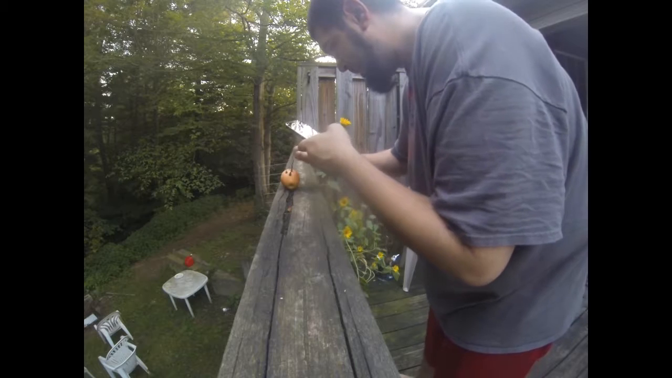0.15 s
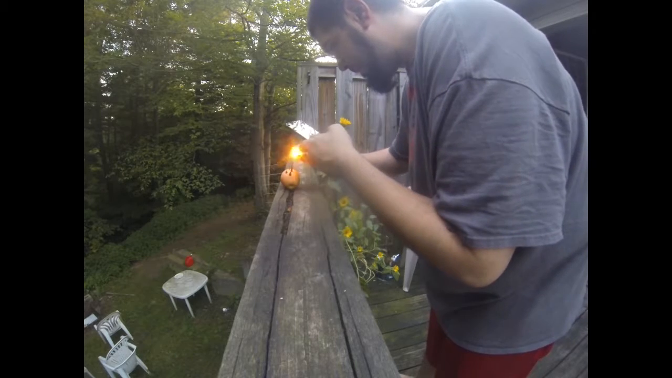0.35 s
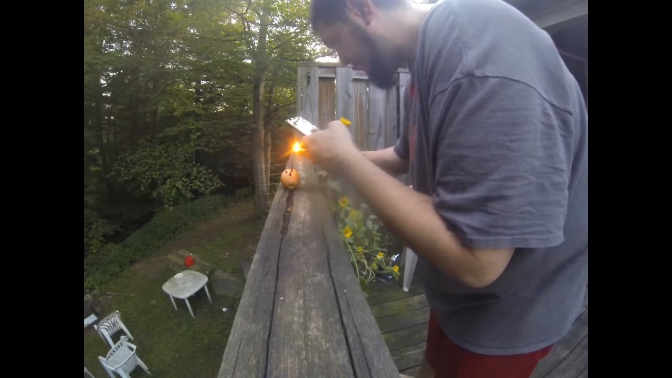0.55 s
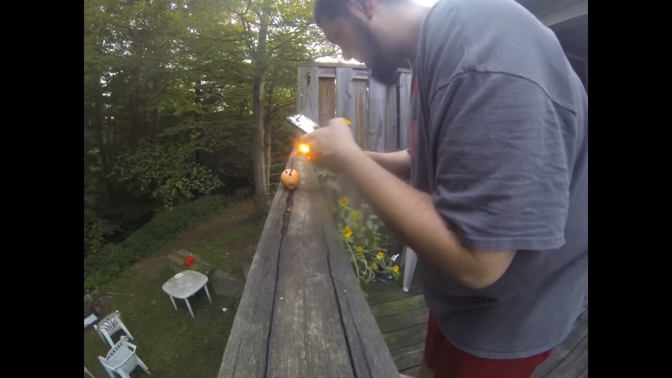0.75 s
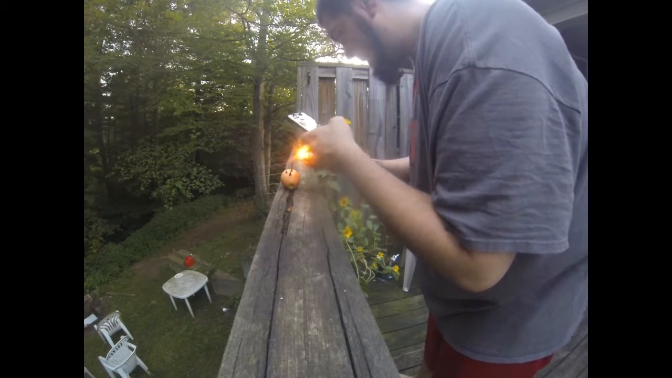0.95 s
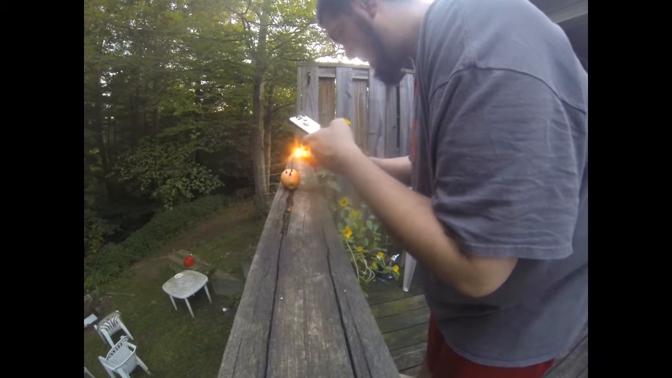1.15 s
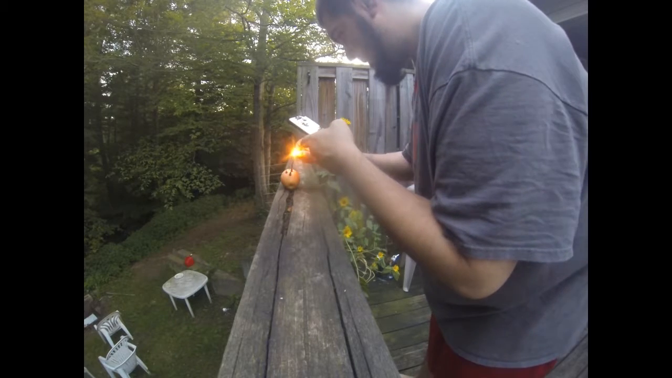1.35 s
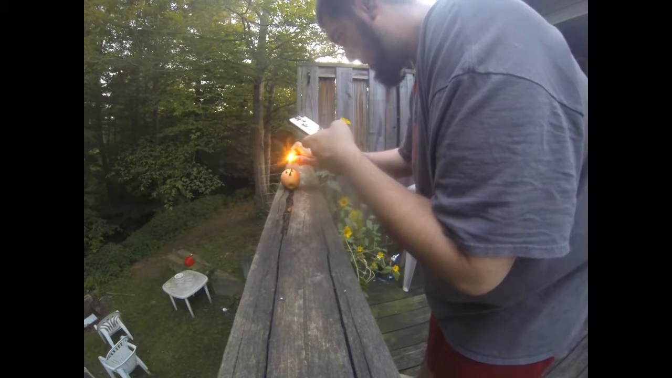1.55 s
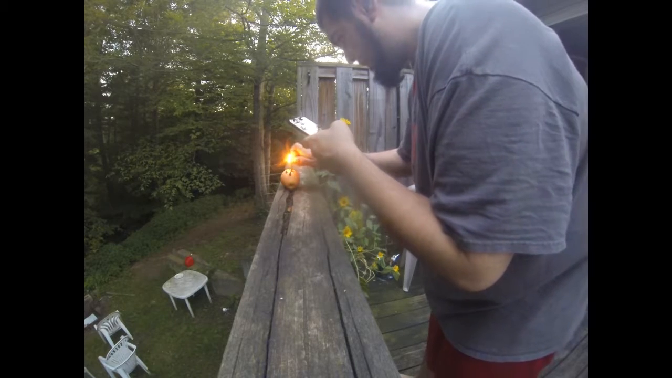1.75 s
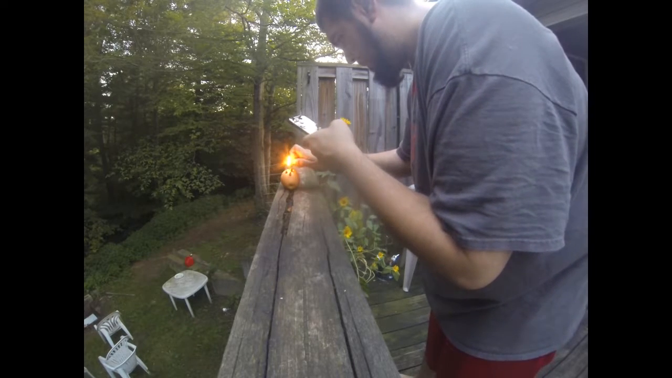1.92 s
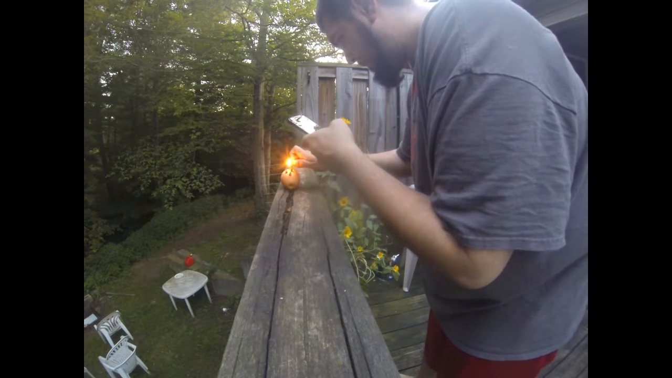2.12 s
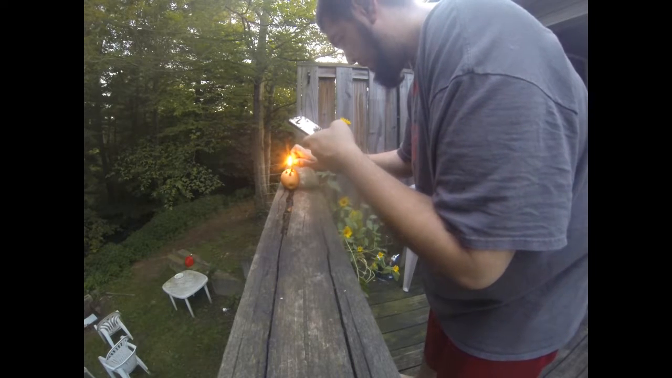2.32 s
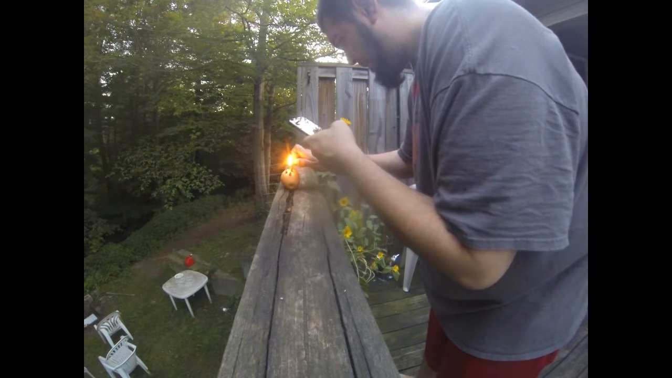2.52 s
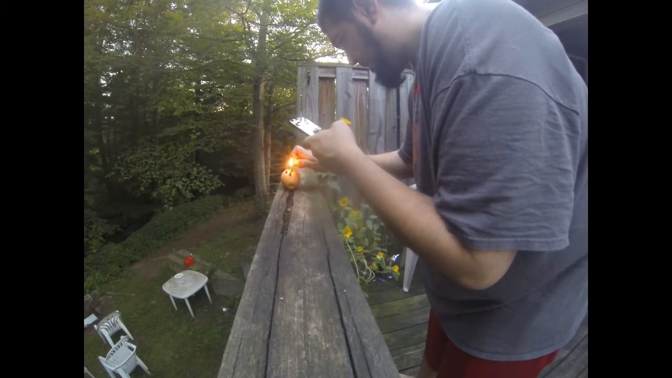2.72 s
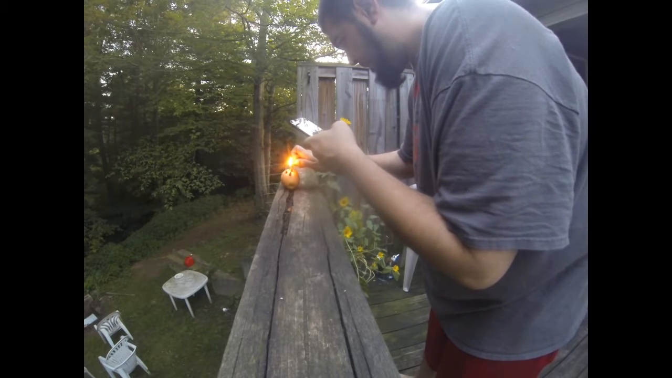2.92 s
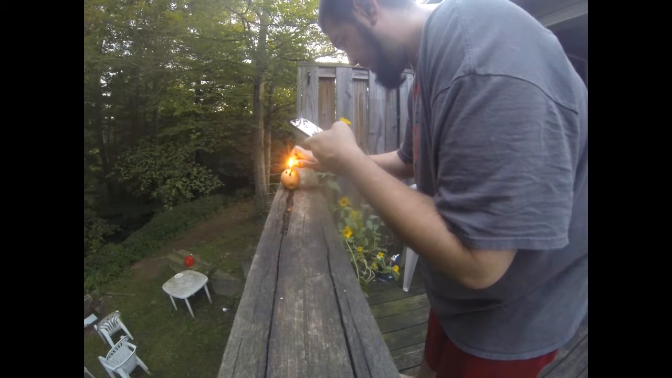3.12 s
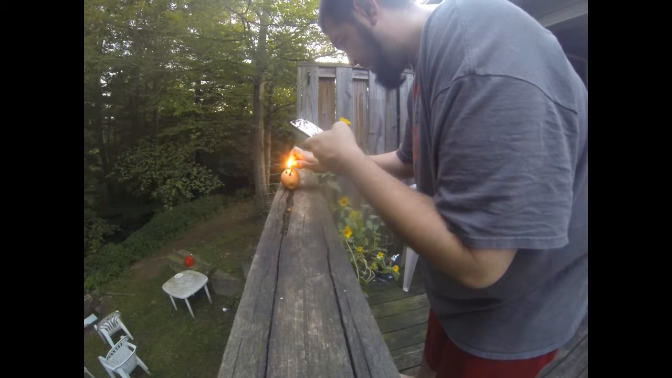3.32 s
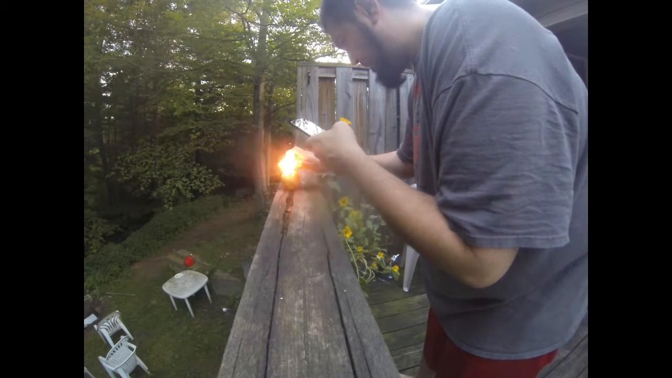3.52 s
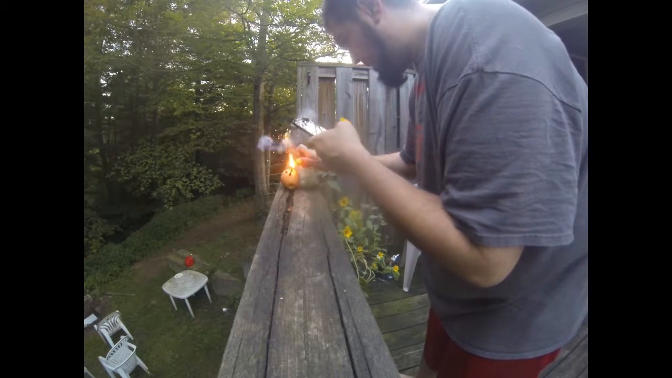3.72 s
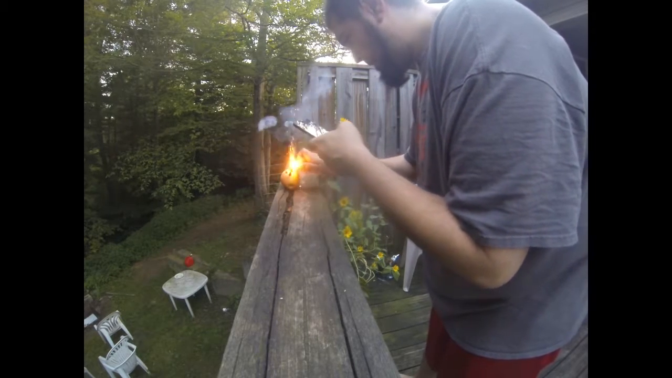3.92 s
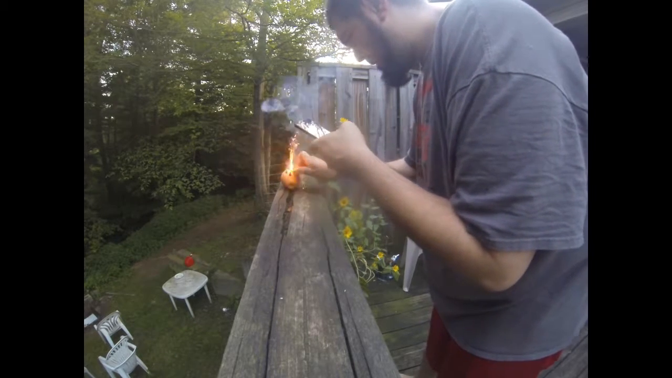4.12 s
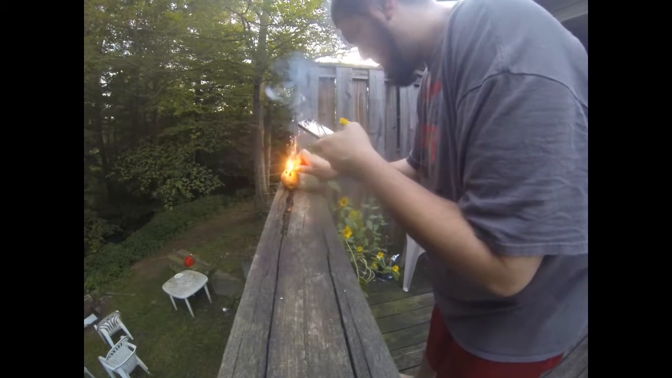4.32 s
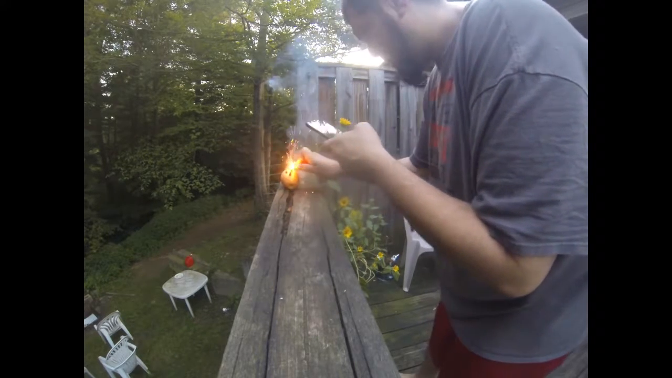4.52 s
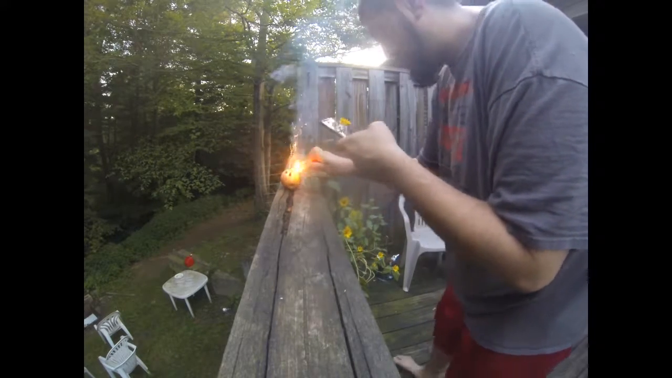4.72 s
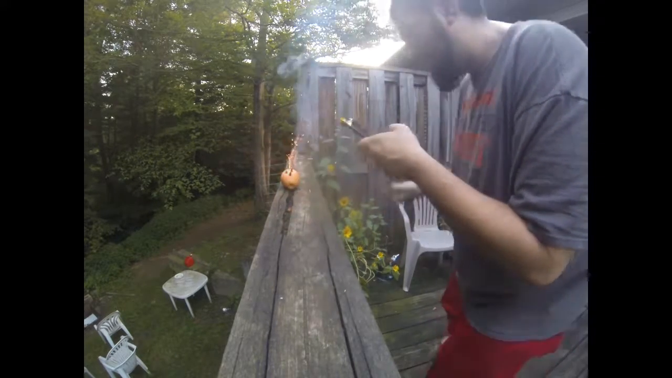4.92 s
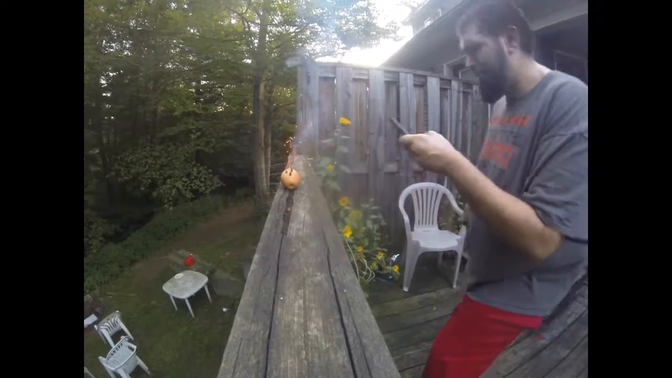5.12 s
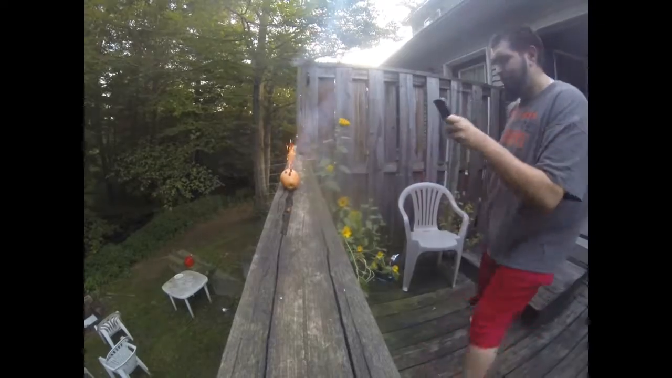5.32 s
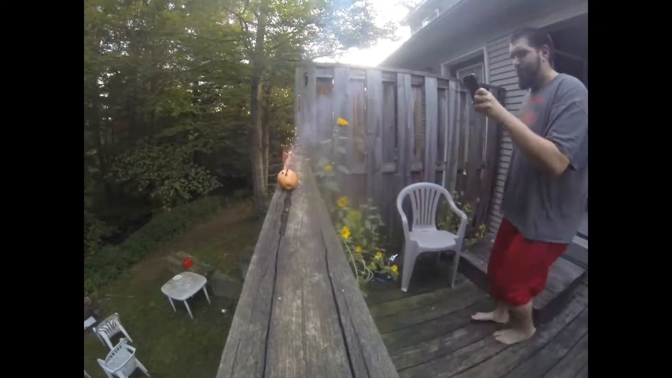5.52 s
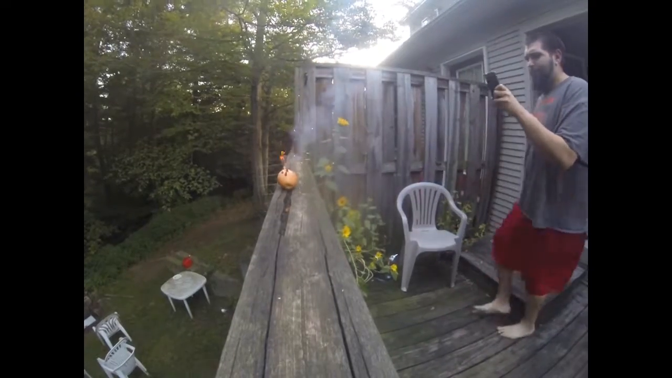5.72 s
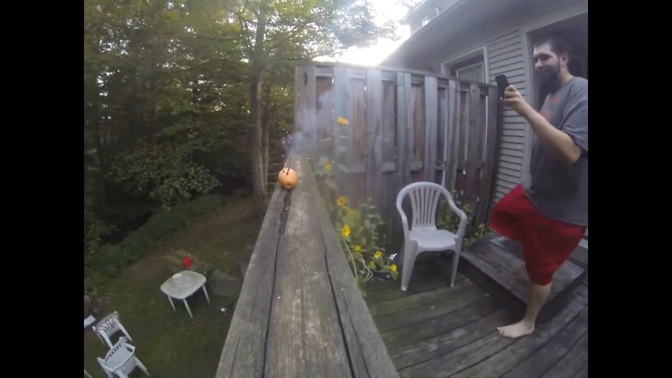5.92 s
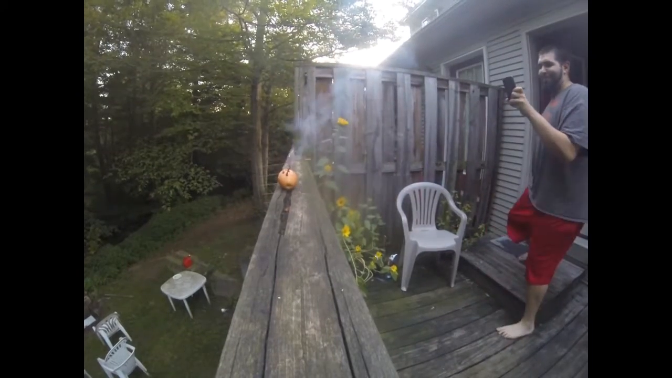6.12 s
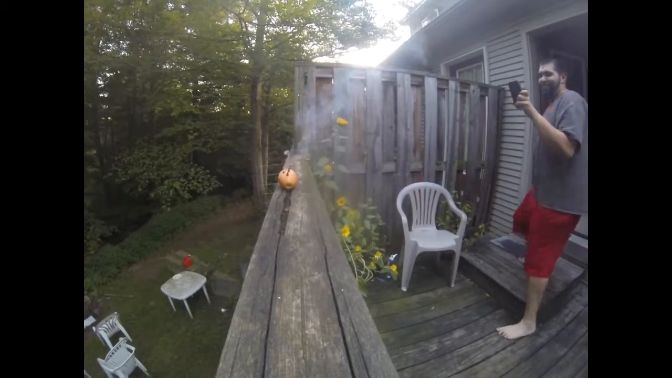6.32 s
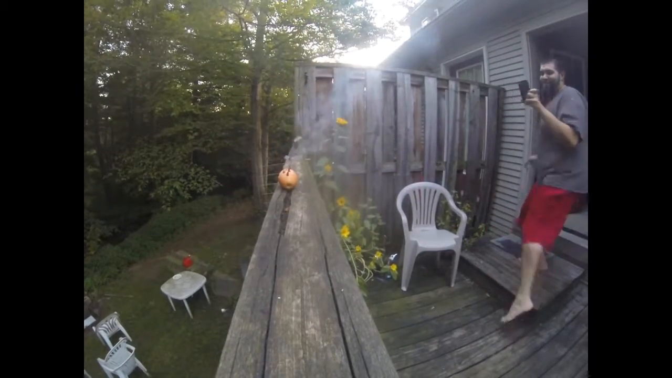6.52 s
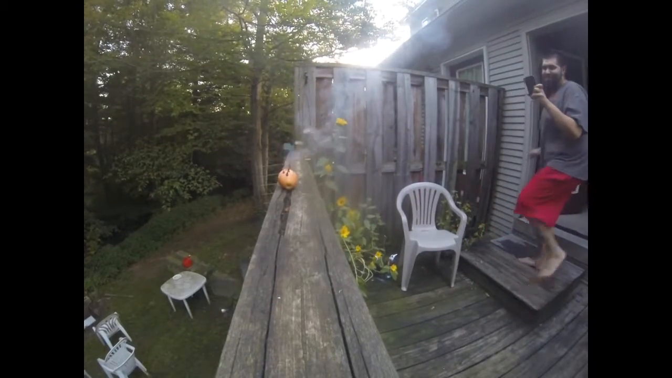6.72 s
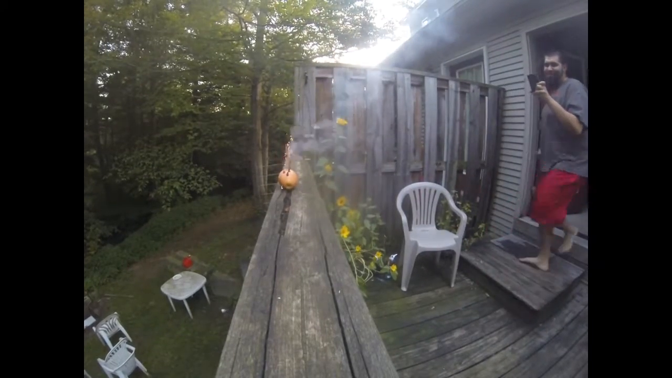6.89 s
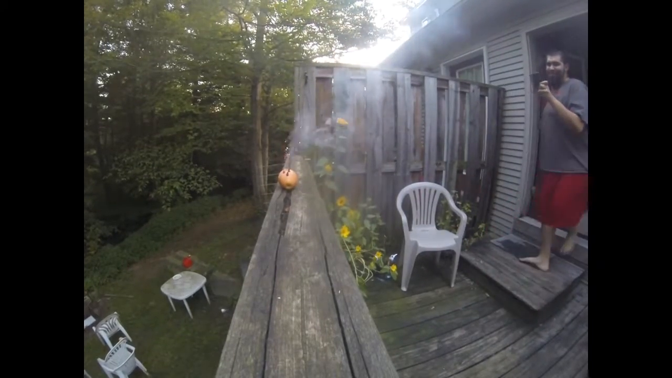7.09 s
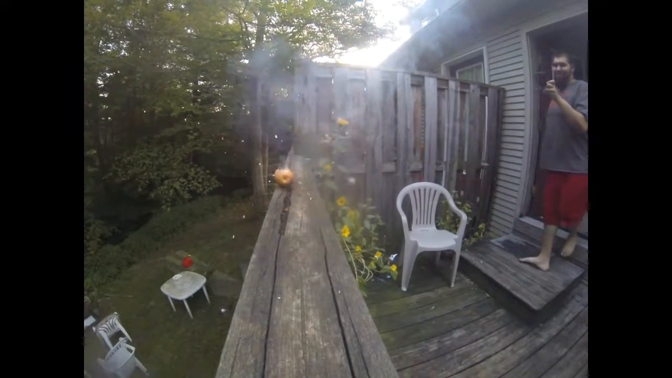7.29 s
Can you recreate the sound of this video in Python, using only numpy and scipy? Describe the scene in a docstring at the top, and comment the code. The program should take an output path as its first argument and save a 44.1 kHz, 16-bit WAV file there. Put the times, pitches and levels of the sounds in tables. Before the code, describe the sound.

A distant lawn mower drones as bare feet retreat across porch boards and a firecracker goes off close by with a sharp bang.

```python
"""A wooden porch, the microphone on its rail, a one-cylinder mower throbbing some gardens away.
Close by, a lighter is struck, the fuse of a small firecracker fizzes faintly, and bare feet knock over
the deck boards in retreat. The cracker goes off on the rail: its shock wave overloads the recorder,
ducks the gain and rolls back from the house and the trees."""
import sys
import numpy as np
from scipy import signal
from scipy.fft import rfft, irfft, next_fast_len
from scipy.io import wavfile
from scipy.ndimage import uniform_filter1d

SR = 44100
rng = np.random.default_rng(int(sys.argv[2]) if len(sys.argv) > 2 else 0)


def wav_record(signal):
    """Record a signal, one row per channel, as 16-bit PCM in the file named by sys.argv[1]."""
    frames = np.transpose(np.atleast_2d(signal))
    bounded = np.clip(frames, -1, 1)
    # unit amplitude maps onto the largest positive 16-bit level
    quanta = np.round(bounded * 32767).astype(np.int16)
    wavfile.write(sys.argv[1], SR, quanta)


N = 324135
TIME = np.arange(N) / SR

# the blast, then its reflections off rail, deck, fence and house wall: t/s, level/dB, top f/Hz
BLAST_ARRIVALS = [(7.0480, 31, 3300), (7.0535, 2, 1480), (7.0565, 19, 1300), (7.0615, 2, 4000),
                  (7.0695, 25, 3800), (7.0750, 15, 2400), (7.0805, 1, 2200)]
BANG_S = BLAST_ARRIVALS[0][0]


def from_db(db):
    """Decibels to gain."""
    return np.exp(np.asarray(db) * (np.log(10) / 20))


def rms_one(x):
    """Scale to rms 1."""
    return x / np.sqrt(np.mean(x ** 2) + 1e-20)


def in_time(rows):
    """Each column of a curve, sample by sample."""
    s, *columns = np.transpose(rows)
    return [np.interp(TIME, s, c) for c in columns]


def cut(x, hz, kind, order=2):
    """Butterworth low- or high-pass."""
    return signal.sosfilt(signal.butter(order, min(hz, .45 * SR), kind, fs=SR, output="sos"), x + 1e-18)


def noise(spectrum):
    """Noise of rms 1, shaped by rows of f/Hz, relative level/dB."""
    hz, db = np.transpose(spectrum)
    size = next_fast_len(N)
    bins = np.maximum(np.fft.rfftfreq(size, 1 / SR), 1)
    gain = from_db(np.interp(np.log(bins), np.log(hz), db))
    skirts = np.minimum(bins / hz[0], 1) ** 4 * np.minimum(hz[-1] / bins, 1) ** 8
    return rms_one(irfft(rfft(rng.standard_normal(size)) * gain * skirts, size)[:N])


def resonance(x, hz, width_hz):
    """Two-pole band-pass."""
    r = np.exp(-np.pi * width_hz / SR)
    return signal.lfilter([1 - r, 0, r - 1], [1, -2 * r * np.cos(2 * np.pi * hz / SR), r * r], x)


def wavering_tone(hz, width_hz):
    """Noise twice through one resonance, rms 1."""
    return rms_one(resonance(resonance(rng.standard_normal(N), hz, width_hz), hz, width_hz))


def drift(rate_hz, t=TIME):
    """A random wander with a spread near 1."""
    return np.interp(t * rate_hz, np.arange(8000), rng.standard_normal(8000))


def dying(start, t60):
    """An envelope that jumps to 1 and dies away."""
    out, at = np.zeros(N), round(start * SR)
    age = TIME[:min(SR // 2, N - at)]
    out[at:at + len(age)] = from_db(-60 * age / t60)
    return out


def swell(start, attack_s, hold_s, t60):
    """An envelope that rises to 1, holds and dies away."""
    age = TIME - start
    return np.clip(age / attack_s, 0, 1) * from_db(-60 * np.clip((age - attack_s - hold_s) / t60, 0, 10))


def bursts(rows, spectrum):
    """Short dying puffs of noise."""
    return sum(from_db(db) * dying(s, t60) for s, db, t60 in rows) * noise(spectrum)


def recorder_noise(hiss_db=-64, pulse_hz=48, pulse_depth=.6):
    """The microphone's hiss and the pulsing whistle of the electronics."""
    hiss_spectrum = [(2900, -3), (3400, -4), (4400, -6), (5220, 2), (6000, -11.5), (7100, -13.5),
                     (8000, -16), (10200, -16), (11400, -20.5), (13000, -17), (13800, -31), (15000, -26)]   # noise floor: f/Hz, level/dB
    tones = [(6450, 90, -79.5), (12900, 110, -81.5)]   # whistle: f/Hz, width/Hz, level/dB
    whistle = sum(from_db(db) * wavering_tone(hz, width_hz) for hz, width_hz, db in tones)
    pulsing = 1 + pulse_depth * np.sin(2 * np.pi * pulse_hz * TIME)
    return from_db(hiss_db) * noise(hiss_spectrum) + whistle * pulsing


def garden(rumble_db=-39, insect_hz=8000):
    """Low rumble of the open air and an insect's faint, short trills."""
    rumble_spectrum = [(15, -13), (26, -13), (48, -11.5), (90, 4), (130, -4.5), (240, -4), (310, -7),
                       (400, -21)]   # outdoor air: f/Hz, level/dB
    trills = [(1.12, 1.42, -80), (2.68, 3.15, -81), (4.43, 4.74, -79)]   # insect calls: start t/s, end t/s, level/dB
    trilling = np.zeros(N)
    for start, end, db in trills:
        progress = np.clip((TIME - start) / (end - start), 0, 1)
        trilling += from_db(db) * np.sqrt(np.abs(np.sin(np.pi * progress)))
    return from_db(rumble_db) * noise(rumble_spectrum) + trilling * wavering_tone(insect_hz, 350)


def exhaust(boom_hz=81.4, boom_width_hz=10, boom_trim_db=-1, throb_lag_s=0.0012, stray_db=-45):
    """The firings' harmonics pass a low boom and a moving band; stray paths make each one waver."""
    engine_speed = [(0, 17.15), (1.2, 16.9), (1.5, 16.8), (2.6, 16.8), (3.0, 16.7), (4.5, 16.6),
                    (7.3, 16.45)]   # firing rate: t/s, f/Hz
    boom_curve = [(0.0, -34.5), (1.03, -32), (1.42, -40.5), (1.56, -34), (1.62, -56), (1.73, -32.5),
                  (2.24, -39), (2.71, -32.5), (2.77, -55), (2.81, -29), (2.88, -31.5), (2.92, -38),
                  (3.04, -31.5), (3.82, -28.5), (3.9, -23.5), (4.0, -39), (4.05, -27.5), (4.74, -32),
                  (4.76, -37), (4.85, -24.5), (5.24, -30.5), (5.28, -45), (5.32, -30.5), (5.57, -24.5),
                  (6.1, -32.5), (7.0, -31)]   # the low boom: t/s, level/dB before the trim
    # the throb swells and its band moves as the paths change: t/s, level/dB, centre f/Hz, half width/Hz
    throb_curve = [(0, -38, 220, 10.4), (.9, -33.5, 213.7, 7.6), (1.5, -36, 196.5, 18.4),
                   (2.0, -33.5, 184, 33), (3.1, -33.5, 174, 23), (4.8, -34, 168, 21.6),
                   (6.2, -42.5, 159, 77), (6.7, -39, 227, 31)]
    # engine orders, crankshaft and blade among them: multiple of the firing rate, level/dB
    engine_orders = [(2, -47), (4, -58), (9, -44.5), (12, -51.5), (14, -47), (16, -64), (17, -51.5),
                     (24, -64)]
    step = 21   # a low sound, built at SR / step
    t, order = TIME[::step], np.arange(2, 26)[:, None]
    firing_hz = np.interp(t, *np.transpose(engine_speed))
    hz = order * firing_hz
    boom_db, throb_db, centre, width = (c[::step] for c in in_time(boom_curve) + in_time(throb_curve))
    stray = np.array([drift(7, t) + 1j * drift(7, t) for _ in order])
    boom = (1 + 1j * (hz - boom_hz) / boom_width_hz) ** -2 * (1 + 0.83 * stray)
    throb = (1 + 1j * (hz - centre) / width) ** -2 * np.exp(-2j * np.pi * (hz - centre) * throb_lag_s)
    throb *= 1 + from_db(stray_db - throb_db) * stray   # stray paths hold their level: a weak throb blurs
    gains = from_db(boom_db + boom_trim_db) * boom / np.linalg.norm(boom, axis=0)
    gains += from_db(throb_db) * throb / np.linalg.norm(throb, axis=0)
    drone_db = -40.5 + 1.58 * (throb_db - throb_db.max())   # the tenth harmonic follows the throb
    for multiple, db in engine_orders + [(10, drone_db)]:
        row = round(multiple) - 2
        in_phase = np.exp(1j * np.angle(gains[row]))
        gains[row] += from_db(db) * in_phase * (1 + 0.57 * stray[row])
    cycles = np.cumsum(firing_hz) * step / SR + .52
    wave = np.sqrt(2) * (gains * np.exp(2j * np.pi * order * cycles)).real.sum(0)
    unevenness = from_db(-0.64 * drift(27, t))
    return signal.resample_poly(wave * unevenness, step, 1, window=("kaiser", 10))[:N]


def mower(rush_db=-42, whine_trim_db=-1, whine_waver=0.00107, flicker_db=3):
    """Some gardens away the exhaust throbs; the blade adds a rush and a thin whine."""
    whine_tones = [(1421, -57), (1750, -67.5), (1996, -54), (2071, -55), (2206, -78), (2810, -73),
                   (2966, -74.5)]   # the whine's partials: f/Hz, level/dB before the trim
    rush_spectrum = [(190, -20.5), (330, -0.5), (365, -3.5), (403, -1.5), (459, -3.5), (589, -4.5),
                     (780, -1.5), (1340, -10.5), (1540, -13.5), (1680, -6), (1900, -10.5), (2060, -5.5),
                     (2610, -22), (3070, -24.5), (3600, -29.5), (4680, -69.5), (7920, -120)]   # air off the blade: f/Hz, level/dB
    clock = np.cumsum(1 + whine_waver * drift(9)) / SR
    whine = sum(from_db(db + whine_trim_db + flicker_db * drift(13)) * np.sin(2 * np.pi * hz * clock)
                for hz, db in whine_tones)
    return exhaust() + from_db(rush_db) * noise(rush_spectrum) + whine


def fuse(catch_s=3.36, catch_db=-63, rise_db_per_s=.8, sputter_db=3.0):
    """The fuse catches, sputters, flares and burns slowly louder until the bang."""
    fizz_spectrum = [(1500, -1), (2900, 1.5), (4200, -6.5), (6500, -27), (8800, -14.5), (10500, -23),
                     (11500, -19), (14500, -31)]   # the burning fuse: f/Hz, level/dB
    flares = [(3.36, .06, -62), (4.6, 0.29, -64), (6.753, 0.056, -62.5)]   # flare-ups: t/s, hold/s, level/dB
    burn = from_db(catch_db + rise_db_per_s * (TIME - catch_s)) * (TIME > catch_s)
    flaring = sum(from_db(db) * swell(s, 0.028, hold_s, t60=0.74) for s, hold_s, db in flares)
    sputter = from_db(sputter_db * drift(300))
    return np.hypot(burn, flaring) * (TIME < BANG_S) * sputter * noise(fizz_spectrum)


def lighter():
    """Near the microphone, the wheel rasps over the flint."""
    rasps = [(.194, -46, .05), (.2, -44, .03), (.2028, -30.5, 0.019), (.2055, -45, 0.014), (.21, -52, .2)]   # the puffs of one strike: t/s, level/dB, t60/s
    rasp_spectrum = [(700, -30), (1650, 5.5), (2300, -12), (3100, -3), (4200, -22), (5000, -11),
                     (7200, -20), (8800, -13), (11000, -22), (15000, -30)]   # wheel on flint: f/Hz, level/dB
    return bursts(rasps, rasp_spectrum)


def board_knock(low_hz, high_hz, vary_db=3.0, rattle_db=-3, rattle_t60=0.065, air_db=-27, air_t60=0.37):
    """One blow rings the boards' modes and a dense rattle of the frame; peak 1."""
    board_modes = [(271, -2, 0.053), (361, -4.5, 0.094), (469, 2, 0.12), (600, -1.5, 0.075),
                   (717, -14, 0.11), (784, -1.5, 0.082), (895, 1, 0.047), (990, -6.5, 0.11),
                   (1140, 1, 0.05), (1290, -12, 0.068), (1465, -6.5, 0.043), (1677, -0.5, 0.035),
                   (2220, -5.5, 0.024), (2750, -7, 0.026), (3080, -14, 0.051), (3540, -6, 0.036),
                   (4560, -1, 0.013)]   # deck boards: f/Hz, level/dB, t60/s
    t = TIME[:SR // 5]
    hz, db, t60 = np.transpose(board_modes)[:, :, None]
    signs = (-1) ** np.arange(len(hz))[:, None]
    struck_db = db + vary_db * rng.standard_normal(hz.shape)
    modes = signs * from_db(struck_db - 60 * t / t60) * np.sin(2 * np.pi * hz * t)
    rattle_decay = from_db(rattle_db - 60 * t / rattle_t60) + from_db(air_db - 60 * t / air_t60)
    rattle = rng.standard_normal(len(t)) * rattle_decay
    blow = cut(cut(modes.sum(0) + rattle, low_hz, "high"), high_hz, "low", order=4)
    return blow / np.abs(blow).max()


def footsteps(attack_s=0.031, sway_hz=25, grit_db=5.5):
    """Bare feet retreat: heels and loose boards knock, soles scuff, the deck sways under the weight."""
    steps = [(4.849, 0.14, -46, -45.5), (5.176, 0.12, -30, -37), (5.362, 0.068, -47, -40),
             (5.594, .11, -32, -37.5), (6.225, 0.24, -37, -48.5)]   # weight comes onto a foot: t/s, hold/s, sway level/dB, scuff level/dB
    # knocks on the deck, duller for a soft contact: t/s, peak level/dB, bottom f/Hz, top f/Hz
    knocks = [(4.9679, -30, 350, 1030), (5.2075, -2.5, 1000, 2370), (5.276, -12.5, 1010, 1390),
              (5.4364, -1, 370, 685), (5.4396, -16, 760, 800), (5.4453, -2, 468, 550),
              (5.456, -9, 444, 540), (5.6201, -11, 200, 484), (5.6245, -16, 600, 1390),
              (5.633, -21, 220, 357), (5.6575, -27, 350, 1300), (5.718, -22, 250, 550),
              (5.731, -29, 250, 550), (6.007, -13.5, 233, 393), (6.118, -20.5, 240, 390)]
    ticks = [(5.188, -56, .015), (5.257, -37, .015), (5.409, -41, 0.045), (5.4495, -37, 0.014),
             (5.635, -44, 0.042), (5.709, -54, 0.018), (6.018, -48, .015), (6.19, -50.5, 0.018)]   # small dry ticks from the boards: t/s, level/dB, t60/s
    scuff_spectrum = [(150, -19), (400, 13.5), (1000, 0), (1800, -8), (2900, -11), (4200, -42), (7000, -39),
                      (10500, -39), (14500, -43)]   # sole over wood: f/Hz, level/dB
    bright_spectrum = [(1500, 10.5), (2900, 7), (4500, -3.5), (7000, -11), (10000, -9), (14500, -24)]   # the ticks and one sliding sole: f/Hz, level/dB
    sway = sum(from_db(db) * swell(s, attack_s, hold_s, t60=1.8) for s, hold_s, db, _ in steps)
    scuff = sum(from_db(db) * swell(s, attack_s, hold_s, t60=0.21) for s, hold_s, _, db in steps)
    slide = from_db(-46) * swell(5.18, attack_s, hold_s=0.107, t60=0.09)
    grit = from_db(grit_db * drift(150))
    out = grit * (scuff * noise(scuff_spectrum) + slide * noise(bright_spectrum))
    out += bursts(ticks, bright_spectrum)
    out += sway * wavering_tone(sway_hz, width_hz=18)
    for s, db, low_hz, high_hz in knocks:
        blow, at = from_db(db) * board_knock(low_hz, high_hz), round(s * SR)
        out[at:at + len(blow)] += blow
    return out


def firecracker(pulse_s=0.00076, echo_pulse_s=0.0001, porch_db=4.5, trees_db=-10.5, grain_db=2.0):
    """A close shock wave with its reflections, a jolt of the rail, and tails from porch and trees."""
    porch_spectrum = [(88, -66), (150, -36), (262, -8), (833, 4.5), (1090, -8), (1460, -7), (2230, -7),
                      (3270, -5), (6060, -23), (8750, -21), (15000, -40)]   # near reverberation: f/Hz, level/dB
    trees_spectrum = [(120, -14), (300, -12), (480, -7), (720, 0), (1050, 4), (1400, -6.5), (1900, -3.5),
                      (2600, -2), (3300, 0.5), (3900, -6), (5300, -8), (7100, -25), (8800, -16),
                      (15000, -39)]   # scatter from the trees: f/Hz, level/dB
    rail_modes = [(660, 29.5, 0.011), (893, 26.5, 0.019), (1170, 20, 0.023), (1850, 40.5, 0.0038),
                  (2660, 27.5, 0.0066)]   # the jolted rail: f/Hz, level/dB, t60/s
    t = TIME[:SR // 10]
    porch = from_db(porch_db) * dying(BANG_S, t60=0.16) * noise(porch_spectrum)
    trees = from_db(trees_db) * swell(BANG_S, 0.0092, hold_s=0.11, t60=0.63) * noise(trees_spectrum)
    out = (porch + trees) * from_db(grain_db * drift(700))
    jolt = sum(from_db(db - 60 * t / t60) * np.sin(2 * np.pi * hz * t) for hz, db, t60 in rail_modes)
    for k, (s, db, top_hz) in enumerate(BLAST_ARRIVALS):
        # a steep front, then a longer suction; small reflectors return only a short pulse
        age, at = t / (echo_pulse_s if k else pulse_s), round(s * SR)
        shock = from_db(db) * cut((1 - age) * np.exp(-age), top_hz, "low", order=3)
        out[at:at + len(t)] -= shock + jolt * (k == 0)
    return out


def scene():
    """Everything as it reaches the one microphone on the rail."""
    return (mower() + garden() + fuse() + lighter() + footsteps() + firecracker() + recorder_noise())[None]


def limiter(x, ahead_s=0.013, most_db=19.0, release_db_per_s=5):
    """Looks ahead, turns the gain down for peaks over full scale, and recovers slowly."""
    over_db = np.clip(20 * np.log10(np.abs(x).max(0) + 1e-9), 0, most_db)
    held_db = np.maximum.accumulate(over_db + release_db_per_s * TIME) - release_db_per_s * TIME
    duck_db = uniform_filter1d(np.interp(TIME + ahead_s, TIME, held_db), size=128)
    return x * from_db(-duck_db)


def record(dry, cutoff_hz=15200):
    """The recorder ducks its gain, clips what is still too loud and cuts the top treble."""
    clipped = np.clip(limiter(dry), -1, 1)
    return signal.sosfilt(signal.ellip(12, .1, 80, cutoff_hz, fs=SR, output="sos"), clipped)


dry = scene()
out = record(dry)
wav_record(out)
```